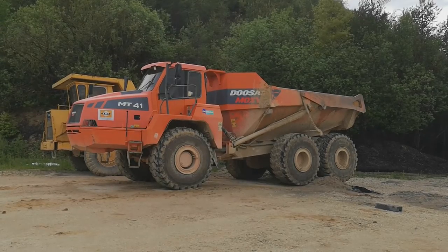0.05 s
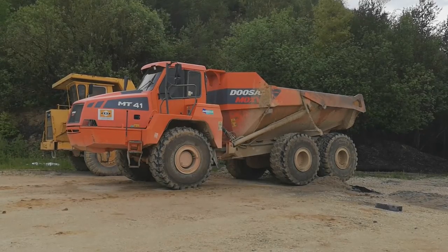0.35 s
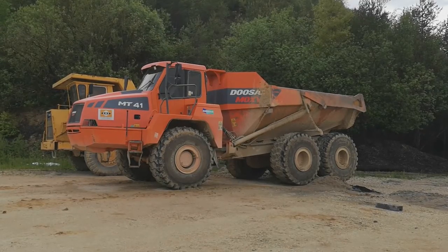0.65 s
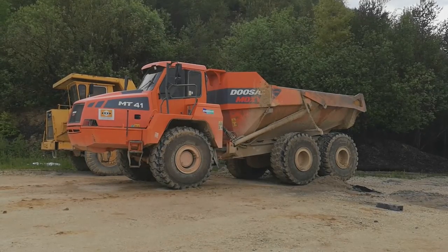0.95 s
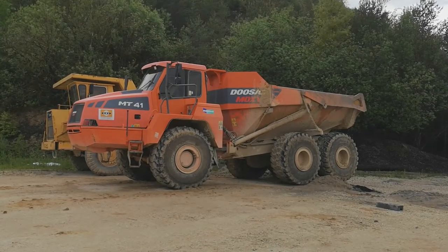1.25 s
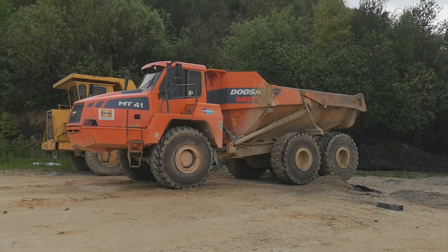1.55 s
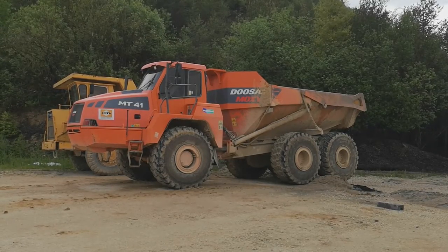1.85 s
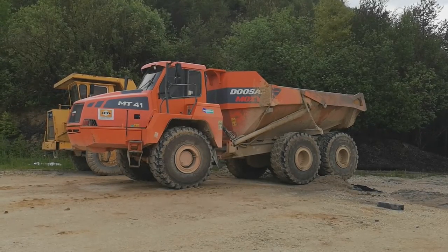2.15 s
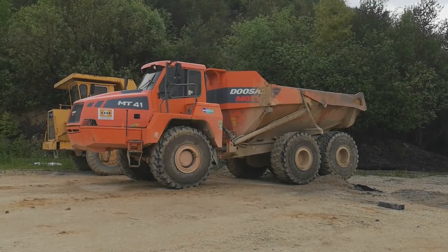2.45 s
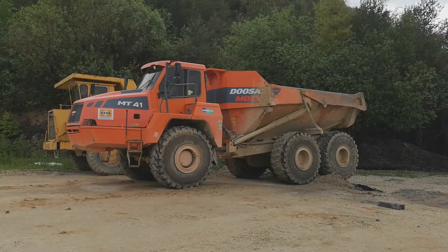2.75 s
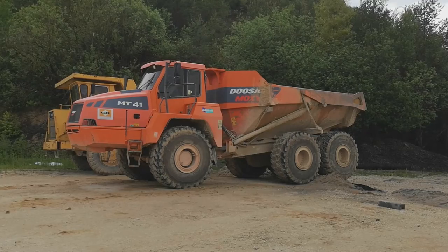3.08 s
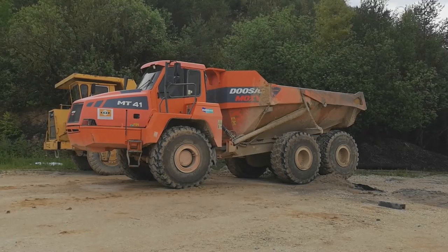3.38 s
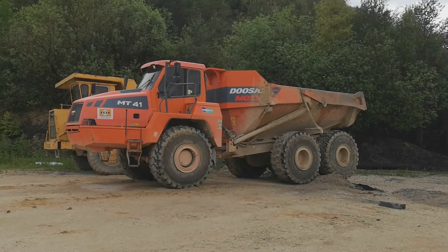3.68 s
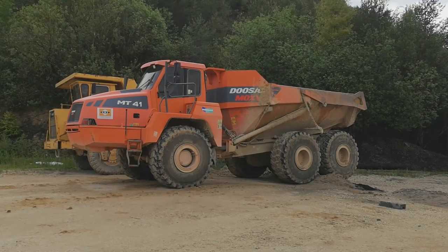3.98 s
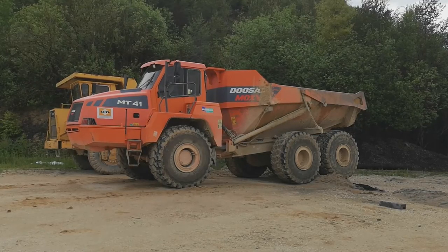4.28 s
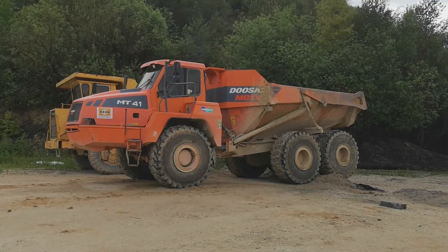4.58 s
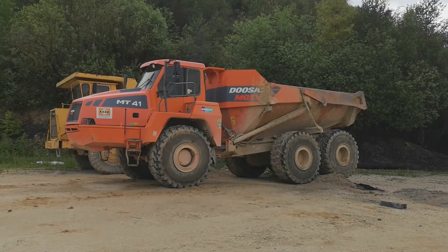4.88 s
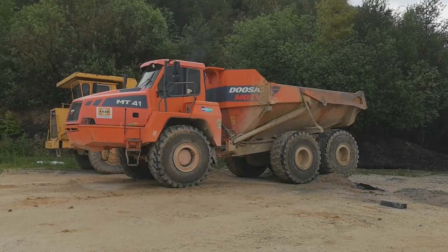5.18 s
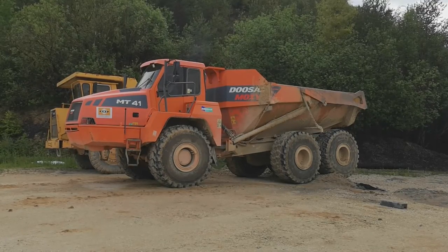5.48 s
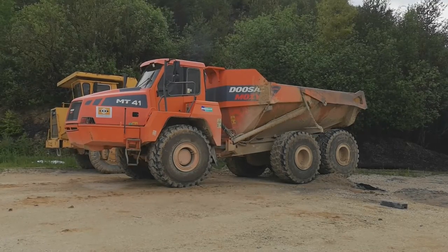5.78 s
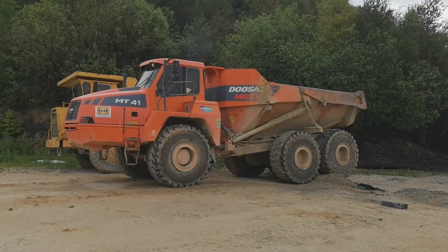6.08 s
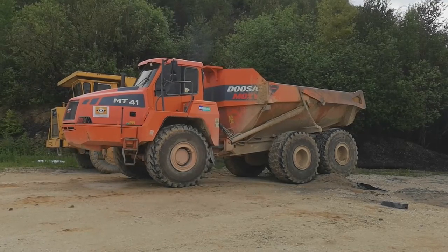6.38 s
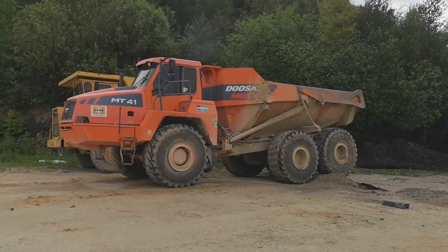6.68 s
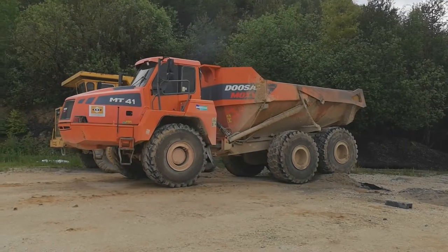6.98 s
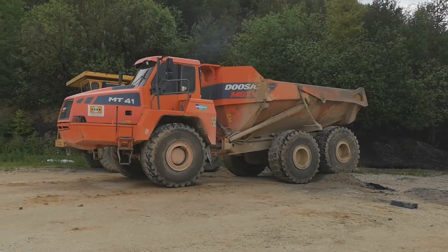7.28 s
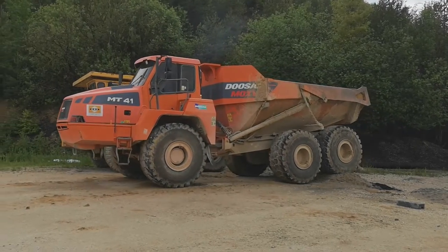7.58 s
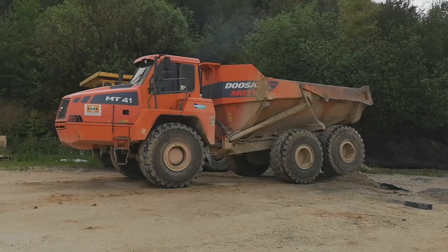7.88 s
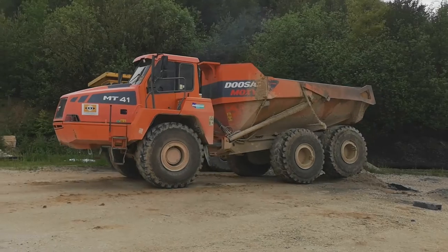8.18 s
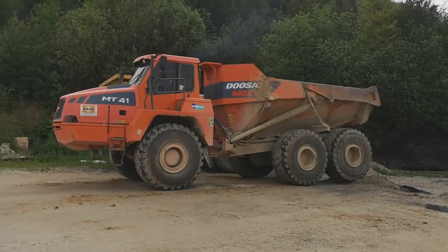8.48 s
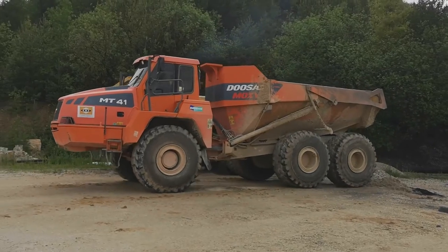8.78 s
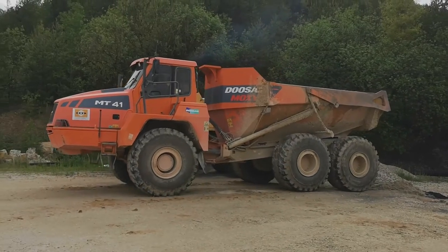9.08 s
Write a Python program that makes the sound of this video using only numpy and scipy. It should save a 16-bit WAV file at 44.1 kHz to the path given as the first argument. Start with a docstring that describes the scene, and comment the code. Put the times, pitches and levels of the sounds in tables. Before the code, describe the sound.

Heard from close by on an open quarry site, a heavy diesel truck ticks over with a rhythmic clatter, jingling fittings and high, intermittent squeaks. It labours slightly, gives one short rev and drops back to idle. Then the engine climbs in pitch and loudness to a deep, growling roar with fan noise, ending with a run of quick slaps from a loose panel.

```python
"""A six-cylinder diesel dump truck idles in a quarry, labours, blips its throttle, then revs up under load.
Its firings send pressure pulses and puffs of gas down the exhaust pipe, which drones, and excite the
block and panels, which growl and clatter. The fan rushes, belt-driven parts hum, fittings jingle and thin
metal squeaks in spurts. A loose panel slaps near the end. The open site rumbles faintly underneath."""
import sys
import numpy as np
from scipy import signal
from scipy.fft import rfft, irfft, next_fast_len
from scipy.io import wavfile
from scipy.ndimage import uniform_filter1d, map_coordinates

SR = 44100
rng = np.random.default_rng(int(sys.argv[2]) if len(sys.argv) > 2 else 0)


def put_to_file(sound):
    """Save the sound as 16-bit audio at rate SR, in the file named by the first command-line argument."""
    columns = np.atleast_2d(sound).T  # one column per channel
    safe = np.clip(columns, -1, 1)
    whole_steps = np.round(safe * 32767)
    wavfile.write(sys.argv[1], SR, whole_steps.astype(np.int16))


N = 403074
TIME = np.arange(N) / SR
CYLINDERS = 6


def amp(db):
    """Amplitude ratio of a level in decibels."""
    return 10 ** (np.asarray(db) / 20)


def unit(x):
    """Normalisation to an rms of 1."""
    return x / np.sqrt(np.mean(x ** 2) + 1e-20)


def along(points, hz):
    """Interpolation of (Hz, value) points on a logarithmic frequency axis."""
    f, v = np.transpose(points)
    return np.interp(np.log(hz + 1), np.log(f + 1), v)


def swell(x, centre, half):
    """A Gaussian bell of height 1."""
    return np.exp(-((x - centre) / half) ** 2)


def gate(start, end, ramp_s):
    """A trapezoidal envelope, at half height at start and end."""
    return np.clip(.5 + np.minimum(TIME - start, end - TIME) / ramp_s, 0, 1)


def wobble(rate):
    """Smooth random modulation with rate knots a second."""
    return map_coordinates(rng.standard_normal(int(N * rate / SR) + 4), [np.arange(N) * rate / SR])


def tone(turns, db, waver_db, drift):
    """A sinusoid under random amplitude and phase modulation."""
    gain = amp(db + 4 + waver_db * wobble(12))
    return gain * np.sin(2 * np.pi * (turns + rng.uniform()) + drift * wobble(8.4))


def filtered(x, response):
    """Linear filtering: the spectrum is multiplied by a frequency response."""
    size = next_fast_len(N + SR // 2)
    return irfft(rfft(x, size) * response(np.fft.rfftfreq(size, 1 / SR)), size)[..., :N]


def resonance(f, hz, width):
    """Frequency response of a damped oscillator."""
    return 1j * f * width / (hz * hz - f * f + 1j * f * width)


# Likeness of the two channels. Each row: frequency in Hz, left-right correlation.
COHERENCE = [(60, .97), (260, .96), (340, .8), (440, .25), (600, .47), (770, .86), (1200, .32), (1450, .8),
             (1700, .38), (2050, .53), (3050, .4), (3500, .12), (4400, .55), (5600, .48), (6300, .25),
             (10000, .25)]
def spread(pair, colour):
    """Partial coherence: two independent signals mix into coloured stereo of rms 1, alike in the bass."""
    turn = lambda f: np.arccos(np.clip(along(COHERENCE, f), -1, 1)) / 2
    mid, side = filtered(pair, lambda f: colour(f) * np.array([np.cos(turn(f)), np.sin(turn(f))]))
    return unit(np.array([mid + side, mid - side]))


def cyclic_noise(cycle, repeat, size):
    """Partial periodicity: in two noises, the share repeat of the power recurs every engine cycle."""
    fine = 4 * size
    patterns = signal.resample(rng.standard_normal((2, size)), fine, axis=1)
    locked = np.array([np.interp(cycle % 1, np.arange(fine) / fine, p, period=1) for p in patterns])
    density = np.sqrt(1 / (size * np.gradient(cycle)))  # the same power per Hz as white noise
    return np.sqrt(repeat) * density * locked + np.sqrt(1 - repeat) * rng.standard_normal((2, N))


def strokes(cycle, decay, uneven_db, scatter_db):
    """Exponential decay after each firing; every cylinder has its own strength."""
    firing = cycle * CYLINDERS
    k = np.floor(firing).astype(int)
    own = rng.standard_normal(CYLINDERS)
    chance = rng.uniform(-1, 1, 1024)
    strength_db = uneven_db * unit(own - own.mean())[k % CYLINDERS] + scatter_db * chance[k % 1024]
    return unit(uniform_filter1d(amp(strength_db) * np.exp(-(firing % 1) / decay), size=200))


# Engine speed. Each row: time in seconds, firing rate in Hz.
ENGINE_SPEED = [(0.0, 34.07), (0.9, 34.01), (1.4, 32.87), (2.1, 32.66), (2.9, 33.77), (4.1, 34.14),
                (4.33, 40.8), (4.55, 39.9), (4.75, 33.0), (5.05, 32.58), (5.25, 34.1), (5.52, 34.14),
                (6.0, 45.0), (6.25, 49.33), (6.6, 53.0), (7.8, 62.55), (8.8, 72.1), (9.14, 76.7)]
def crankshaft():
    """Rotational inertia: spare fuel accelerates the shaft, so throttle is read from the gain in speed."""
    full_throttle_hz_per_s, pedal_s = 30, 0.12
    firing_hz = np.interp(TIME, *np.transpose(ENGINE_SPEED))
    cycle = np.cumsum(firing_hz) / SR / CYLINDERS  # four-stroke cycles elapsed
    revs = (firing_hz - firing_hz.min()) / np.ptp(firing_hz)  # 0 at idle, 1 at full speed
    gaining = np.gradient(firing_hz) * SR / full_throttle_hz_per_s
    throttle = uniform_filter1d(gaining, size=int(pedal_s * SR))  # negative while the fuel is cut
    return firing_hz, cycle, revs, throttle


# Pipe resonances lift the drone. Each row: firing rate in Hz, first and second harmonic levels in dB.
DRONE_HARMONICS = [(32.77, -38.5, -35.5), (34, -33.5, -46.5), (41.4, -23, -38), (49.4, -18.5, -30.5),
                   (50, -13.5, -25), (54.1, -14.5, -37.5), (57.1, -13, -23.5), (60.8, -12, -21),
                   (64.7, -17.5, -21.5), (70.4, -13.5, -29), (75, -16.5, -31)]
# The engine's lope. Each row: multiple of the cycle rate, level in dB at idle and at full speed.
LOPE_ORDERS = [(4.76, -62, -28), (7.13, -61, -38.5), (8.66, -43.5, -39.5), (9.98, -40, -39.5),
               (10.93, -41, -50), (17.78, -48, -42), (17.99, -55, -40), (28.34, -48, -47.5)]
def drone(cycle, firing_hz, revs, throttle):
    """Periodic pressure pulses form harmonics; unequal cylinders add spectral lines between them."""
    overrun_db, rasp_db = -9, 1.1
    rates, *levels = np.transpose(DRONE_HARMONICS)
    first_db, second_db = (np.interp(firing_hz, rates, db) for db in levels)
    angle = 2 * np.pi * CYLINDERS * cycle
    first = amp(first_db + overrun_db * np.maximum(-throttle, 0) + 0.33 * wobble(24)) * np.cos(angle)
    second = amp(second_db + rasp_db * revs * wobble(60)) * np.cos(2 * angle + 0.082 * wobble(10))
    lope = sum(tone(order * cycle, idle + (full - idle) * revs, waver_db=1.9, drift=0.089 + 0.11 * revs)
               for order, idle, full in LOPE_ORDERS)
    fill_db = -4.5 * swell(TIME, 0, 1.1)  # lighter at first
    return amp(fill_db) * (np.sqrt(2) * (first + second) + lope)


# Spectrum of the exhaust pipe. Each row: frequency in Hz, relative level in dB.
PIPE_SPECTRUM = [(40, -37), (80, -4.5), (110, 0), (140, 1.5), (190, 0), (240, -4), (310, -9), (370, -17.5),
                 (432, -35), (600, -53), (1100, -100)]
def exhaust_gas(cycle, firing_hz, revs, throttle):
    """Turbulent flow: each firing puffs gas through the pipe, louder and less periodic at speed."""
    gas_db = -43 + 22.5 * (1 - np.exp(-revs / 0.26)) - 2 * throttle
    surge_db = 3.5 * swell(firing_hz, 63.4, 1.4)  # a roar around one firing rate
    gas = cyclic_noise(cycle, repeat=0.068 + 0.092 * np.exp(-12 * revs), size=1024)
    puffs = gas * (2 + strokes(cycle, decay=0.87, uneven_db=-8, scatter_db=4.5))
    return amp(gas_db + surge_db) * spread(puffs, lambda f: amp(along(PIPE_SPECTRUM, f)))


# Low spectrum of the block. Each row: frequency in Hz, relative level in dB.
GROWL_SPECTRUM = [(170, -39), (240, -3), (295, -3), (335, -6), (385, -7), (430, -21.5), (600, -72)]
def growl(cycle, revs):
    """Forced vibration: the block growls in a pattern that partly recurs every cycle."""
    level_db = -51.5 + 14.5 * (1 - np.exp(-revs / 0.73))
    shaking = cyclic_noise(cycle, repeat=0.45, size=1024)
    return amp(level_db) * spread(shaking, lambda f: amp(along(GROWL_SPECTRUM, f)))


# Spectrum of block and bonnet. Each row: frequency in Hz, relative level in dB.
BLOCK_SPECTRUM = [(260, -57), (450, -29.5), (684, -7.5), (800, -4.5), (866, -2), (936, -1), (1200, -4.5),
                  (1320, -6), (2160, -5), (2700, -5.5), (3380, -19), (4620, -15), (6500, -30),
                  (8780, -28.5), (10300, -50.5), (13400, -54), (22000, -120)]
# Panel modes. Each row: frequency in Hz, bandwidth in Hz, relative level in dB.
PANEL_MODES = [(857, 41, -7), (1278, 28, -1), (1554, 190, -3), (1986, 62, -1), (2186, 122, 1),
               (2320, 190, -12.5), (5630, 630, -23.5), (7650, 310, -23)]
def clatter(cycle, revs, throttle):
    """Modal excitation: combustion and valve blows rattle the block and ring its panels."""
    fired = cycle - np.interp(1.433, TIME, cycle)  # counted from one combustion

    def blows():
        noise = cyclic_noise(cycle, repeat=.5, size=4096)
        return noise * (3.8 + strokes(fired, decay=.35, uneven_db=.8, scatter_db=1))

    ripple_db = 2.5 * rng.standard_normal(512)  # crowded narrow modes of the sheet metal
    ripple_hz = np.linspace(0, SR / 2, 512)
    block = spread(blows(), lambda f: amp(along(BLOCK_SPECTRUM, f) + np.interp(f, ripple_hz, ripple_db)))
    modes = lambda f: sum((-1) ** k * amp(db) * resonance(f, hz, width) * abs(resonance(f, hz, 4 * width))
                          for k, (hz, width, db) in enumerate(PANEL_MODES))
    panels = spread(blows(), modes)
    hard_burn_db = 2.5 * np.maximum(throttle, 0)
    return amp(hard_burn_db) * (amp(-36.5 + 1.2 * revs) * block + amp(-39.5 + 0.5 * revs) * panels)


# Knocking parts. Each row: time of one knock in seconds, frequency in Hz, bandwidth in Hz,
# level in dB at idle and at full speed, unevenness in dB.
KNOCKING_PARTS = [(1.439, 1380, 260, -44.5, -68, .7), (1.559, 1400, 190, -52.5, -68, 3),
                  (1.465, 2250, 550, -48.5, -66, 1), (1.475, 875, 100, -52, -61, 1.5),
                  (1.496, 885, 100, -49.5, -59, 1.5), (1.546, 880, 100, -49, -61, 1),
                  (1.556, 870, 100, -52, -61, 1.5), (1.576, 885, 100, -50, -61, 1.5)]
def knocks(cycle, revs):
    """Impact excitation: each part is struck once a cycle and rings, clearest at idle."""
    out = np.zeros((2, N))
    quadrature = np.array([[0], [np.pi / 2]])
    for s, hz, width, idle_db, full_db, uneven_db in KNOCKING_PARTS:
        turns = cycle - np.interp(s, TIME, cycle)
        k = np.floor(turns).astype(int) % 256
        strength = amp(uneven_db * rng.standard_normal(256))[k]
        contact = strength * np.exp(-(turns % 1) / (.028 + .05 * revs))
        clean = np.sin(2 * np.pi * (hz * TIME + rng.uniform(size=256)[k]) + quadrature)
        scrape = 1.8 * width / 260 * rng.standard_normal((2, N))  # damped parts sound drier
        mode = lambda f: resonance(f, hz, width) * resonance(f, hz, 3 * width) ** 2
        out += amp(idle_db + (full_db - idle_db) * revs) * spread(contact * (clean + scrape), mode)
    return out


# Belt-driven parts. Each row: multiple of the cycle rate, level in dB at free idle and while labouring.
BELT_ORDERS = [(31.8, -53.5, -40.5), (34.23, -46, -41.5), (39.26, -45, -62)]
def belt_hum(cycle, revs):
    """Synchronous rotation: belt-driven parts hum in step with the crankshaft, fading at speed."""
    labour = gate(1.17, 2.7, ramp_s=0.56)
    return sum(tone(order * cycle, free + (loaded - free) * labour - 23.5 * revs, waver_db=2, drift=0.12)
               for order, free, loaded in BELT_ORDERS)


# Spectrum of the cooling air. Each row: frequency in Hz, relative level in dB.
AIR_SPECTRUM = [(240, -26), (400, -12.5), (470, -12.5), (856, -2.5), (994, -7.5), (1120, -9.5), (1730, -7),
                (1860, -7.5), (2310, -5.5), (2680, -10), (4740, -23.5), (5350, -27), (6560, -26.5),
                (7620, -23.5), (10300, -43), (13400, -53.5), (22000, -120)]
def fan(firing_hz):
    """Aerodynamic noise: rush and blade tone grow as powers of fan speed, which a slipping clutch limits."""
    driven_hz, limit_hz = 3.28 * firing_hz, 218
    blade_hz = driven_hz / (1 + (driven_hz / limit_hz) ** 12) ** (1 / 12)
    decades = np.log10(blade_hz / limit_hz)
    air = spread(rng.standard_normal((2, N)), lambda f: amp(along(AIR_SPECTRUM, f)))
    blades = tone(np.cumsum(blade_hz) / SR, -29.5 + 67 * decades, waver_db=1.4, drift=.2)
    return amp(-28 + 40.5 * decades) * air + blades


def quarry():
    """Ambient noise: the open site gives a faint low rumble."""
    hz_db = [(8, -23), (20, -10), (30, 2), (60, -9), (150, -10), (600, -50), (3000, -74)]
    return amp(-39.5) * spread(rng.standard_normal((2, N)), lambda f: amp(along(hz_db, f)))


# Spells of harder shaking. Each row: centre in seconds, half length in seconds, boost in dB.
SHAKE_SPELLS = [(.17, .04, 2), (.47, .03, 2.5), (2.991, .032, 1), (4.55, 0.14, 1.5)]
def jingle(cycle, revs):
    """Forced vibration: light metal fittings shiver with the firings."""
    spells_db = sum(db * swell(TIME, s, half) for s, half, db in SHAKE_SPELLS)
    unrest_db = 1.9 * wobble(14)
    shake = rng.standard_normal((2, N)) * amp(spells_db + unrest_db)
    shake *= 1.3 + strokes(cycle, decay=.45, uneven_db=1, scatter_db=3)
    hz_db = [(2500, -53), (4200, 1), (5000, -9), (5600, -4.5), (6100, -5.5), (6500, -11),
             (7900, -9.5), (10000, -33), (15000, -38)]
    return amp(-48.5 + 2 * revs) * spread(shake, lambda f: amp(along(hz_db, f)))


# Spurts of squeaking. Each row: start in seconds, length in seconds, level in dB, pitch in Hz.
SQUEAK_SPURTS = [(0.01, 0.18, -44, 4370), (.23, 0.13, -44.5, 4170), (.45, .14, -46.5, 4300),
                 (0.779, 0.15, -44.5, 4250), (1.08, 0.15, -47, 4380), (1.28, .21, -48, 4450),
                 (1.5, 0.41, -43.5, 4490), (1.928, 0.84, -45, 4510), (2.9, 0.22, -43, 4540),
                 (3.248, 0.32, -41, 4540), (3.57, 0.32, -44.5, 4560), (3.903, 0.26, -43.5, 4580),
                 (4.148, 0.12, -39.5, 4820), (4.281, 0.1, -40, 4850), (4.501, 0.26, -45, 4170),
                 (4.881, 0.45, -44.5, 4540), (5.352, .14, -45.5, 4440), (5.571, 0.16, -43.5, 4760),
                 (5.832, 0.28, -44, 4710), (6.149, 0.32, -46.5, 4660), (6.45, .25, -47.5, 4600)]
def squeak(cycle):
    """Narrow-band resonance: thin metal, shaken by the firings, squeaks under a faint higher ring."""
    def ring(turns, half_width_hz):
        fuzz = filtered(rng.standard_normal((2, N)), lambda f: 1 / (1 + (f / half_width_hz) ** 2))
        return spread(fuzz * np.sin(2 * np.pi * turns), lambda f: f > 0)

    edge_s = .06
    level = sum(amp(db) * gate(s, s + length, edge_s) for s, length, db, _ in SQUEAK_SPURTS)
    starts, _, _, pitches = np.transpose(SQUEAK_SPURTS)
    spurt = np.maximum(np.searchsorted(starts - edge_s / 2, TIME) - 1, 0)
    note = ring(np.cumsum(pitches[spurt]) / SR, half_width_hz=175)
    upper = ring(5550 * TIME, half_width_hz=140)
    shake = unit((1 + .3 * np.sin(2 * np.pi * CYLINDERS * cycle)) * amp(1.8 * wobble(14)))
    upper_db = -54 - 6 * np.minimum(TIME / 1.6, 1) ** 2 + 2 * wobble(10)
    return shake * (level * note + amp(upper_db) * upper)


# Heavier exhaust beats. Each row: centre in seconds, level in dB, frequency in Hz.
HEAVY_BEATS = [(1.02, -22.5, 57), (4.199, -25, 57.7), (4.385, -23, 44.4)]
def thumps():
    """Pressure transients: a heavier exhaust beat is a short, low wave packet."""
    return sum(amp(db) * swell(TIME, s, 0.039) * np.sin(2 * np.pi * hz * (TIME - s))
               for s, db, hz in HEAVY_BEATS)


# Brief swells of engine tones. Each row: centre and half length in seconds,
# multiple of the cycle rate, level in dB.
TONE_SWELLS = [(4.41, 0.15, 39.2, -40), (4.39, 0.17, 49, -50.5), (4.31, 0.084, 17, -33),
               (4.66, .06, 17, -33.5), (4.43, 0.061, 15, -30), (4.53, 0.13, 28, -35), (4.55, .1, 18, -34.5),
               (4.68, 0.075, 35, -36.5), (4.85, 0.19, 24, -38.5), (5.3, 0.2, 18.3, -40.5),
               (6.05, 0.082, 24, -34), (6.42, 0.21, 34, -41), (7.92, 0.13, 14, -28), (7.9, .12, 16, -33.5),
               (7.92, .15, 18, -30.5), (8.33, 0.11, 13, -33), (8.68, .22, 24, -40.5), (8.85, .35, 30, -43)]
def tone_swells(cycle):
    """Amplitude modulation: exhaust notes and the belt-driven hum rise and fade at listed times."""
    return sum(swell(TIME, s, half) * tone(order * cycle, db, waver_db=-0.5, drift=0.6)
               for s, half, order, db in TONE_SWELLS)


# Slaps of a loose panel. Each row: start in seconds, peak level in dB, frequency in Hz.
PANEL_SLAPS = [(8.277, -25.5, 870), (8.455, -26.5, 860), (8.628, -24, 890), (8.795, -23.5, 865),
               (8.89, -25, 870), (8.918, -27, 870), (8.9595, -15.5, 875), (8.983, -27, 865),
               (9.037, -26, 860), (9.119, -22.5, 865)]
def panel_slaps():
    """Damped free vibration: each slap rings the loose panel, which rebounds once."""
    rise_s, decay_s, rebound_s, rebound_db = .001, .0058, .014, -11
    out = np.zeros((2, N + SR))
    t = np.arange(SR // 10) / SR
    envelope = (1 - np.exp(-t / rise_s)) * np.exp(-t / decay_s)
    for s, db, hz in PANEL_SLAPS:
        for delay, loss_db in ((0, 0), (rebound_s, rebound_db)):
            ring = envelope / envelope.max() * np.sin(2 * np.pi * (hz * t + rng.uniform()))
            start = round((s + delay) * SR)
            out[:, start:start + len(t)] += amp(db + loss_db) * ring
    return out[:, :N]


# Stereo balance. Each row: frequency in Hz, left minus right level in dB.
LEFT_EXCESS = [(190, 0), (410, -1.5), (570, 5), (860, -4), (1230, 3), (1650, -8), (1930, -2.5), (2450, -10),
               (3300, -4.5), (4200, -2.5), (4600, -7.5), (6000, -3.5), (7500, 2.5), (8500, -4),
               (10000, -1.5)]
# Stereo phase. Each row: frequency in Hz, lead of the left channel in radians.
LEFT_LEAD = [(200, .1), (350, 0), (690, .3), (860, .9), (1060, 2), (1300, 0), (1560, .2), (1800, -1.4),
             (2050, .3), (2500, 5.2), (2950, 6.7), (3800, 10.3), (4400, 9.7), (5600, 12), (6100, 12.3),
             (6500, 15.6), (8200, 16.9), (9300, 18.8)]
def stereo_image(x):
    """Directional cues: level and phase at left and right vary with frequency."""
    sides = np.array([[.5], [-.5]])
    balance = lambda f: amp(sides * along(LEFT_EXCESS, f))
    return filtered(x, lambda f: balance(f) * np.exp(1j * sides * along(LEFT_LEAD, f)))


def scene():
    """Superposition: the sounds of the truck, paced by one crankshaft, add to the quarry's rumble."""
    firing_hz, cycle, revs, throttle = crankshaft()
    tones = drone(cycle, firing_hz, revs, throttle) + thumps() + tone_swells(cycle)
    gas = exhaust_gas(cycle, firing_hz, revs, throttle)
    block = growl(cycle, revs) + clatter(cycle, revs, throttle) + knocks(cycle, revs)
    fittings = panel_slaps() + jingle(cycle, revs) + squeak(cycle)
    return stereo_image(tones + gas + block + fittings + belt_hum(cycle, revs) + fan(firing_hz) + quarry())


def record(dry):
    """Band limiting: an ideal low-pass filter passes nothing above 15100 Hz."""
    return filtered(dry, lambda f: f < 15100)


dry = scene()
out = record(dry)
put_to_file(out)
```